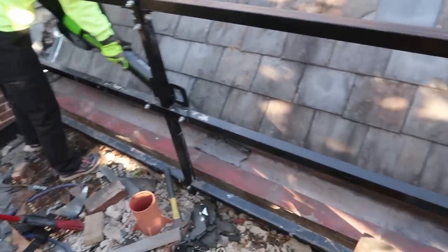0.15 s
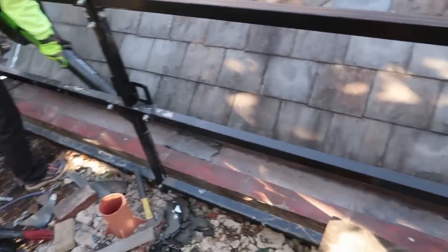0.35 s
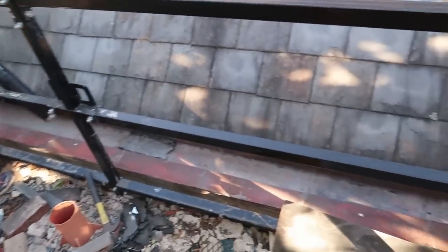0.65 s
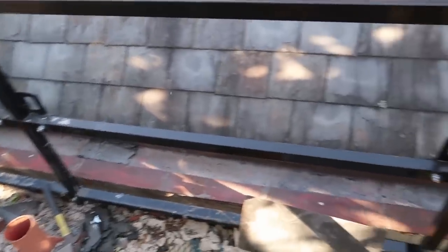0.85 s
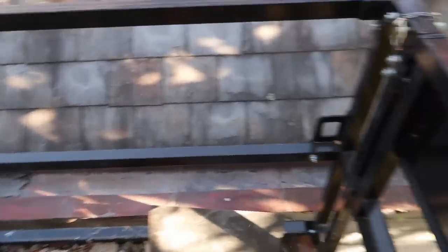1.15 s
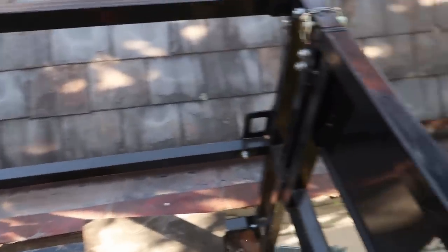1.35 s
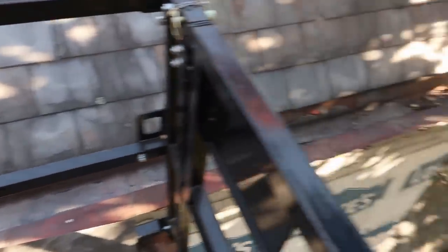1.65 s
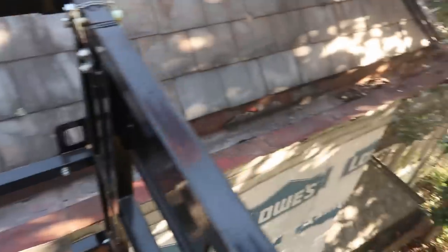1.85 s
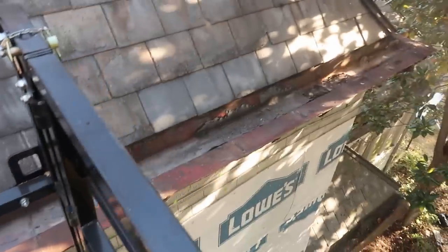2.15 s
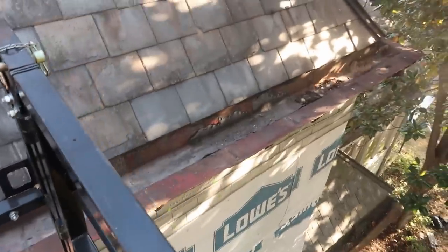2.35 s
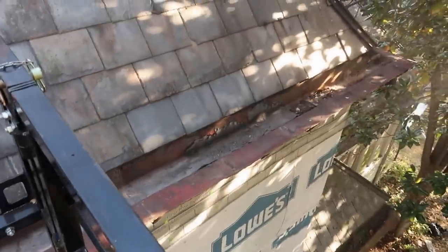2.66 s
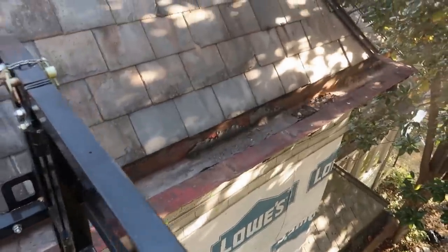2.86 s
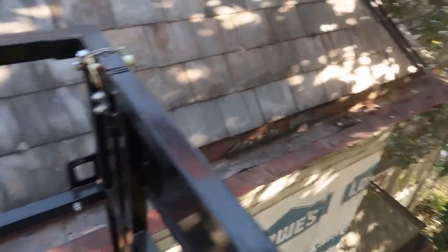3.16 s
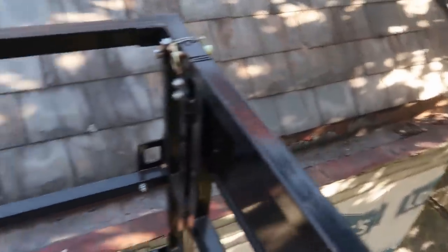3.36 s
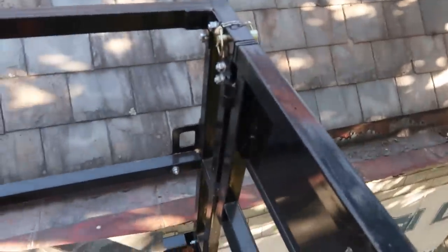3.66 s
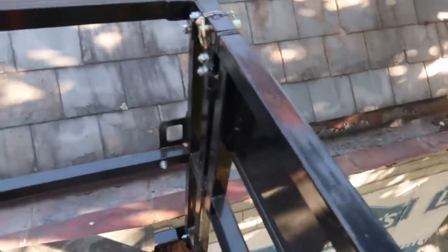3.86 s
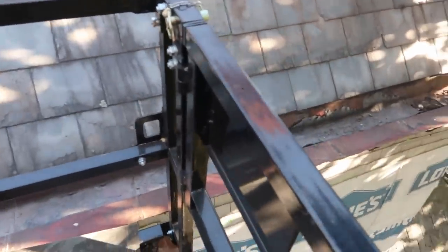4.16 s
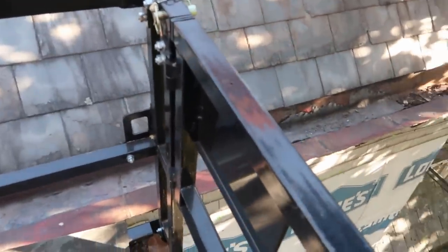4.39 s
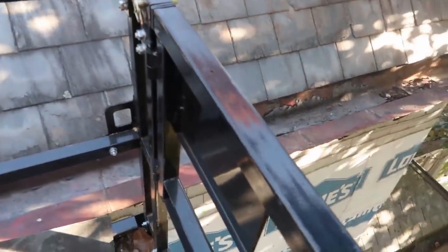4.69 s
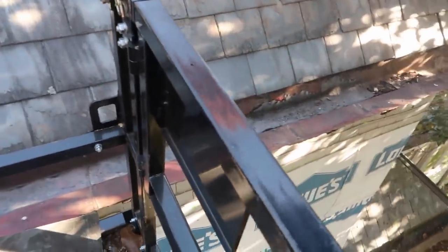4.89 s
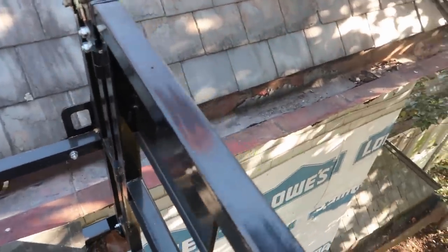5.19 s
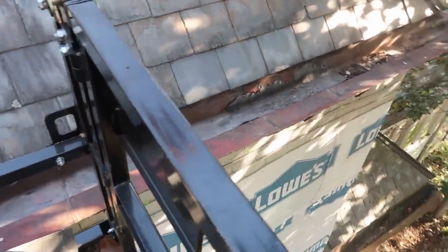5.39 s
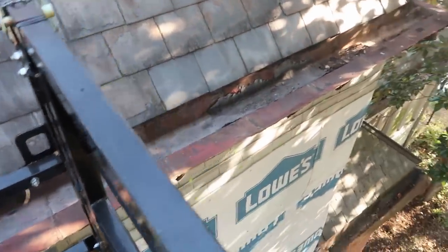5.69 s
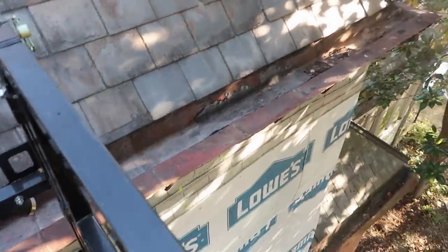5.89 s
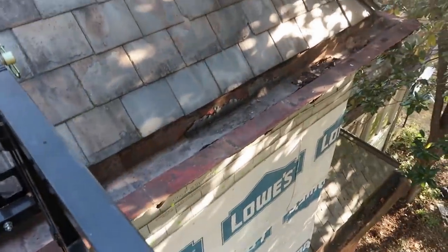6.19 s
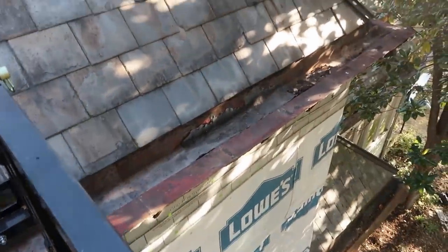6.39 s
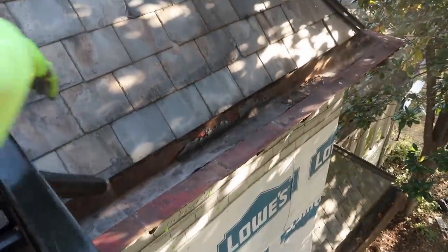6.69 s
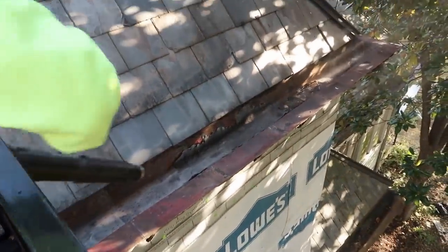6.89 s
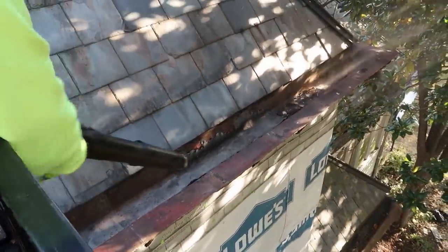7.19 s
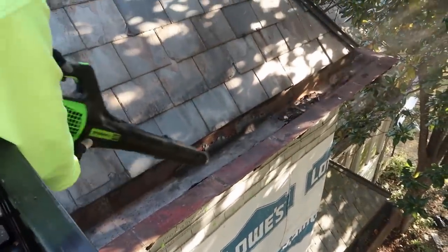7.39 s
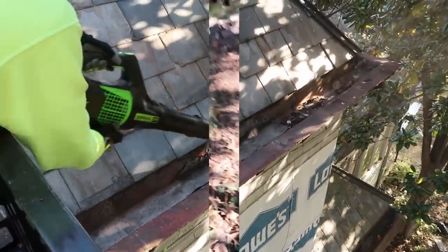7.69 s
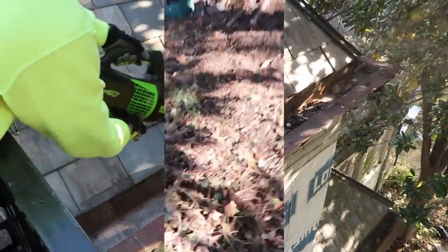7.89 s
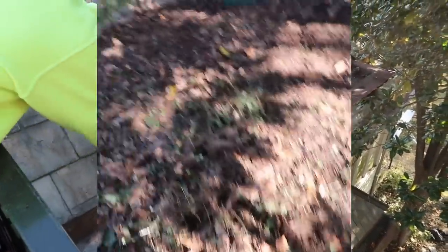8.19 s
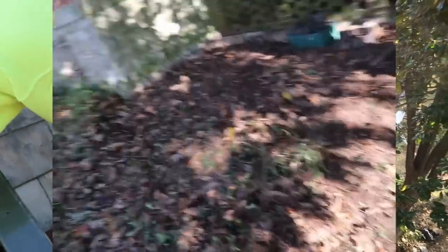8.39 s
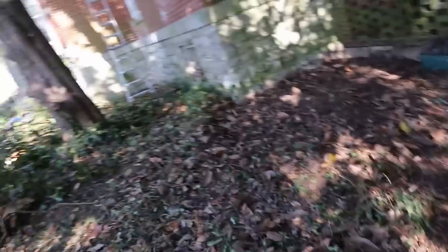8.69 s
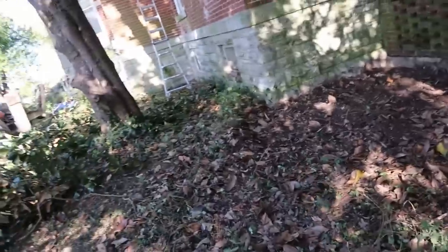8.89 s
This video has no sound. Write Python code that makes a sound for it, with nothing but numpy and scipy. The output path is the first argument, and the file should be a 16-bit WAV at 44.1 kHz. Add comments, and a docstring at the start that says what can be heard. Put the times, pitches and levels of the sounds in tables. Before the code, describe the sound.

From 0 s a leaf blower is already running flat out, close to a stereo microphone beside a slate roof gutter. Its fan gives a hum near 316 Hz with buzzing harmonics and a strong whine near 3.8 kHz, steady in pitch but flickering rapidly in level. A broad air jet rushes over it, with low buffeting heaviest in the first 1.5 s, while fine grit patters densely on the slates. From 1.5 to 6.7 s grit is sparse; the roar swells and dips, with brief hollow resonances and brighter hiss around 4.8 s. Near 7 s a sharp burst of grit and hiss passes. From 7.8 to 8.7 s the blower fades out, with a barely audible thin whistle around 8.3 s. A quiet yard emerges: low rumble, faint drone, a leaf scuff, tiny twig snap and soft crunching steps until about 9 s.

```python
"""The gutter of a slate roof: a leaf blower runs flat out close to a microphone pair.
Its twelve-bladed fan hums and whines as rotor orders that follow one shaft speed, each with its own
wandering phase; the jet is band-filtered noise, with resonances of the tube and of hollows in the
gutter; grit rings as short clicks on the slates.
At the end the roof fades across to a quiet yard: rumble, a faint drone, soft steps on dry leaves."""
import sys
import numpy as np
from scipy import signal
from scipy.fft import next_fast_len
from scipy.io import wavfile

SR = 44100
rng = np.random.default_rng(int(sys.argv[2]) if len(sys.argv) > 2 else 0)


def dump_mix(stems):
    """Bounce the given channels to the path in sys.argv[1] as a 16-bit WAV at rate SR."""
    frames = np.atleast_2d(stems).T  # one column per channel
    limited = np.clip(frames, -1, 1)  # hard clip at full scale
    pcm = np.round(limited * 32767).astype(np.int16)
    wavfile.write(sys.argv[1], SR, pcm)


N = 399103

# yard noise colour: hz, relative_density_db
YARD_COLOUR = [(25, -20), (55, 0), (110, -9), (170, 7), (230, -1), (700, -5), (1300, -6.5), (1900, -17),
               (2900, -18.5), (7500, -35), (10500, -33), (14000, -39)]
# footfalls on leaves: start_s, thud_db, crackle_db (before band-pass and a gain of 2)
STEPS = [(8.70, -33, -42), (8.7605, -40, -25), (8.835, -31, -37), (8.89, -30, -42), (8.914, -35, -44),
         (8.99, -44, -36)]
# foot brushing through leaves: start_s, length_s, level_db
SCUFF = (8.5, 0.24, -40.5)
# dry twig snapping underfoot: start_s, level_db (before band-pass), decay_s
TWIG = (8.774, -45, .0012)
# thin, brief whistle: start_s, length_s, pitch_hz, peak_level_db
WHISTLE = (8.14, .37, 1422, -41)

# draught on the microphone at 0 dB of buffeting: time_s, level_db
DRAUGHT = [(0, -38), (.4, -36), (1.1, -44), (3.2, -47), (4, -51), (4.6, -56), (5.6, -51.5), (6.4, -43.5),
           (7.3, -45), (7.8, -44), (8.2, -41)]
# grit blown over the slates: time_s, grains_per_s
GRIT = [(0, 250), (.9, 260), (1.5, 14.46), (6.7, 15), (6.95, 700), (7.12, 540), (7.3, 80), (8.6, 80)]
# short bright ticks: start_s, level_db (shared among the ring pitches)
BRIGHT_TICKS = [(.435, -16), (2.195, -20), (6.926, -11)]
# hollows the jet sets sounding: start_s, length_s, pitch_hz, peak_level_db
HOLLOWS = [(.44, 0.14, 780, -31), (1.9, 0.66, 2220, -33.5), (2.0, 0.59, 2530, -34), (4.235, 0.26, 496, -34),
           (4.7, 0.2, 2410, -30), (5.38, 0.53, 1140, -36), (5.95, 0.35, 810, -37), (5.976, 0.3, 1290, -34),
           (7.22, 0.59, 750, -32), (7.52, 0.19, 1340, -31)]
# resonances of the blower tube: pitch_hz, width_hz, level_db
TUBE = [(424, 48, -47), (870, 34, -45.5), (1420, 67, -43), (2220, 69, -38.5), (2495, 49, -38),
        (3750, 33, -48.5), (3770, 50, -91)]

# band centres of buffeting, roar, rush, hiss: hz
AIR_CENTRES_HZ = (280, 900, 3000, 9500)
# air stream colour, before the band curves: hz, density_db_per_hz
AIR_COLOUR = [(120, -65), (200, -55), (350, -58), (550, -62.2), (820, -60), (1100, -60.6), (1800, -61.2),
              (3000, -61.7), (5000, -62.9), (8500, -68.7), (10700, -67), (13400, -67)]
# left-right likeness of air noise, before treble spread: hz, likeness_0_to_1
LIKENESS = [(100, .997), (700, .975), (1500, .83), (3000, .7), (6000, .68), (9000, .82), (14000, .88)]
# jet buffeting the slates, low mids: time_s, relative_level_db
BUFFET = [(0.02, -1.0), (0.12, -11), (0.32, 2.5), (0.48, 4), (0.56, 0.5), (0.86, 2.5), (0.94, 6),
          (1.26, 2.5), (1.52, -6), (1.82, -2.5), (1.98, -12), (2.1, -3), (2.52, -6), (3.26, -2),
          (3.32, -5.5), (3.54, -0.5), (3.7, -3), (3.94, 1), (4.14, -2), (4.38, -2), (4.5, -6.5), (4.78, -2),
          (5.1, -7.5), (6.08, -9), (6.34, -4), (6.56, -10), (6.84, -1.5), (7.06, -12), (7.78, -11.5),
          (8.34, -7.5)]
# hollow roar of the jet along the gutter: time_s, relative_level_db
ROAR = [(0, -1.5), (.36, -2), (.54, 5), (.84, 1.5), (1.1, 4.5), (1.18, 0.5), (1.26, 7), (1.4, -2),
        (2.02, -3), (3.24, 0.5), (3.76, -5), (4.0, 1), (4.2, -4), (4.38, -0.5), (5.18, 1.5), (5.56, 3),
        (5.74, -1.5), (6.1, 4.5), (6.48, 0), (7.16, 0.5), (7.4, 3.5), (7.62, -0.3), (7.7, -6), (8.34, -2.5)]
# jet from the nozzle: time_s, rush_db, hiss_db (both relative)
JET = [(0.0, 1.4, -1.0), (0.72, 0.0, -1.1), (1.25, 0.8, -0.8), (1.38, -1.8, -1.5), (1.8, 0.2, -1.5),
       (3.32, 0, -1.5), (4.3, 0.4, 1.3), (4.85, 2, 3.8), (5.35, -0.9, 0.3), (5.62, 1.8, 2.9),
       (5.86, -1.7, -0.8), (6.2, 0.3, 2), (6.58, -2.6, -3.3), (6.86, -0.4, -1.4), (7.04, -1.5, 3.6),
       (7.18, -2, -2), (7.3, 0.7, -3.5), (7.62, 0.8, 1.4), (8.4, 2.8, 0.4)]
# direction of the blower: time_s, left_lead_us (nominal; ports() shrinks it in the bass)
LEAD = [(0, 20), (.3, 26), (1, 43.3), (2.4, 60.6), (4, 49.3), (5.5, 49.2), (6.2, 52.7), (6.7, 35),
        (7, 39.4), (7.9, 22), (8.6, 15)]

# fan speed: time_s, turns_per_s
SPEED = [(0.0, 315.6), (0.14, 316.8), (0.32, 317.0), (0.38, 316.3), (0.7, 316.1), (2.04, 316.6),
         (2.16, 316.9), (2.58, 316.4), (3.38, 317.1), (4.22, 316.7), (4.52, 317.2), (4.76, 315.9),
         (5.52, 316.3), (5.62, 315.5), (5.74, 315.8), (7.25, 315.3), (7.42, 315.8), (7.68, 314.9),
         (8.02, 315.6), (8.54, 315.8)]
# blade-passing whine, beamed about as the tube is swung: time_s, level_db (before pan)
WHINE = [(0.02, -33), (0.1, -20.5), (0.13, -38), (0.18, -15.5), (0.21, -23.5), (0.26, -17), (0.32, -29),
         (0.39, -40), (0.44, -28), (0.47, -43), (0.5, -26), (0.54, -32), (0.58, -15.5), (0.62, -36),
         (0.67, -23.5), (0.7, -28), (0.72, -22), (0.78, -31), (0.82, -21.5), (0.89, -23), (0.91, -33),
         (0.99, -21), (1.06, -37), (1.14, -25.5), (1.17, -42), (1.21, -20), (1.25, -28), (1.3, -18.5),
         (1.33, -39), (1.35, -20), (1.4, -44), (1.47, -20.5), (1.56, -39), (1.58, -27), (1.6, -38),
         (1.64, -19), (1.72, -43), (1.77, -41), (1.79, -27), (1.85, -17.5), (1.91, -19), (1.96, -11),
         (2.02, -17), (2.06, -25.5), (2.21, -31), (2.26, -20), (2.37, -19), (2.43, -15.5), (2.48, -16),
         (2.55, -26), (2.6, -35), (2.66, -20.5), (2.68, -20.5), (2.73, -16.5), (2.78, -27), (2.85, -18),
         (2.91, -30), (2.97, -20), (3.02, -50), (3.12, -21.5), (3.17, -28), (3.21, -27), (3.23, -29),
         (3.26, -16.5), (3.37, -29), (3.48, -22), (3.53, -37), (3.56, -18.5), (3.6, -17), (3.7, -34),
         (3.74, -20.5), (3.78, -21), (3.82, -24), (3.88, -19), (3.91, -24.5), (4.01, -32), (4.04, -15.5),
         (4.12, -19.5), (4.16, -16), (4.2, -35), (4.23, -23), (4.31, -30), (4.4, -19.5), (4.56, -18),
         (4.58, -24), (4.66, -20), (4.7, -33), (4.77, -17), (4.84, -33), (4.88, -25), (4.93, -47),
         (5.04, -19), (5.09, -26), (5.14, -15.5), (5.22, -34), (5.31, -22.5), (5.36, -35), (5.47, -26),
         (5.49, -45), (5.56, -41), (5.57, -29), (5.68, -24.5), (5.75, -16), (5.94, -34), (6.04, -29),
         (6.1, -21), (6.13, -25), (6.18, -35), (6.22, -23), (6.32, -15.5), (6.36, -25), (6.43, -14.5),
         (6.51, -26), (6.54, -26), (6.65, -22.5), (6.69, -16.5), (6.73, -35), (6.77, -17), (6.82, -31),
         (6.85, -16.5), (6.9, -28), (6.97, -18.5), (7.03, -23), (7.07, -18), (7.11, -28), (7.15, -15),
         (7.2, -41), (7.28, -38), (7.32, -37), (7.36, -20), (7.42, -28), (7.47, -42), (7.52, -17.5),
         (7.6, -27), (7.73, -22), (7.91, -23.5), (7.97, -20.5), (8.34, -22), (8.6, -19.5)]
# side on which the whine is stronger: time_s, left_minus_right_db
WHINE_PAN = [(0, 2), (.7, 3.5), (1.35, 2.5), (1.5, 0), (4.4, 0), (4.55, -4.8), (5.9, -4.6), (6.05, -2.3),
             (6.45, -2.3), (6.6, 0)]
# mean direction of the whine beam: time_s, left_lead_us
WHINE_LEAD = [(0, 10), (.25, 30), (1.4, 68), (1.9, 59), (4.3, 65), (5.4, 52), (5.9, 33), (6.0, 100),
              (6.16, 160), (6.23, 54), (7.1, 50), (7.55, 25), (8.0, 8.9), (8.3, 56)]
# octave of the whine: time_s, level_db
OCTAVE = [(0.02, -34.5), (0.6, -34.5), (0.88, -38), (0.98, -29), (1.2, -33.5), (1.6, -36), (1.8, -33),
          (2.0, -37), (2.3, -32.5), (2.9, -39), (3.2, -33), (3.37, -38), (3.51, -30), (3.85, -33),
          (4.25, -28.5), (4.45, -32), (4.7, -27.5), (5.07, -27), (5.23, -32), (6.3, -32), (6.85, -36),
          (7.04, -25.5), (7.15, -31), (7.7, -28.5), (8.0, -31), (8.5, -30)]
# whine overtones: multiple, db_above_octave, scattered_amplitude_share, fades_per_s
OVERTONES = [(2, 0, 0.55, 26), (3, -10, 0.9, 24)]
# buzz from uneven blades: rotor_order, relative_level_db
BUZZ = [(13, -43.5), (14, -46.5), (17, -49.5), (18, -49.5), (23, -54), (25, -51), (26, -56)]
# hum fundamental; swells as the roof's reflection meets the direct sound: time_s, level_db
HUM_1 = [(0.02, -19.0), (0.52, -23), (0.76, -21), (0.8, -18.0), (1.24, -17.5), (1.3, -25), (1.38, -22),
         (1.5, -24.5), (1.82, -22.0), (2.42, -22.5), (2.58, -26.0), (3.3, -21.5), (3.52, -20.5),
         (4.02, -22.5), (4.26, -32), (4.44, -26.0), (4.5, -29.5), (4.94, -23.0), (5.32, -28.5),
         (5.66, -29.5), (5.84, -36.0), (6.3, -26), (6.48, -27.5), (6.88, -22.0), (7.26, -26.5), (7.34, -25),
         (7.78, -29.5), (8.34, -28)]
# hum harmonics 2 to 11, one table each: time_s, level_db
HUM_2 = [(0.02, -34), (0.5, -31.5), (0.72, -35), (1.06, -33.0), (1.22, -61), (1.32, -31), (1.82, -31.5),
         (2.08, -59), (2.24, -38), (2.32, -64), (2.56, -30), (3.08, -32), (3.16, -49), (3.5, -36),
         (3.88, -42), (3.96, -35), (4.34, -29.5), (4.5, -36), (4.54, -31.5), (4.98, -31.5), (5.22, -44),
         (5.4, -31.5), (6.22, -28), (6.46, -45), (6.7, -29), (6.96, -28.5), (7.3, -23.0), (7.98, -24),
         (8.02, -29), (8.34, -26)]
HUM_3 = [(0.02, -43), (0.1, -28.5), (0.22, -38), (0.38, -25), (0.56, -30), (0.62, -40.0), (0.74, -29.5),
         (0.86, -53), (1.12, -42), (1.2, -28.5), (1.6, -27.5), (1.98, -32), (2.36, -25), (2.64, -32),
         (2.88, -25.5), (3.26, -30.5), (3.44, -61), (3.66, -23.5), (4.24, -26.5), (4.84, -53),
         (5.52, -29.5), (5.96, -33.5), (6.18, -34), (6.42, -33), (6.56, -54), (6.6, -36), (7.08, -28.5),
         (7.52, -20.5), (7.76, -29), (8.34, -33.5)]
HUM_4 = [(0.02, -33), (0.42, -51), (0.54, -27), (0.7, -40), (0.82, -32), (1.05, -52), (1.11, -28),
         (1.18, -24.5), (1.24, -42), (1.29, -22), (1.38, -26.5), (1.54, -33), (1.74, -38), (2.0, -28.5),
         (2.48, -37.5), (2.66, -29), (2.8, -33), (3.02, -23.5), (3.62, -23), (3.78, -28), (4.44, -25.5),
         (4.54, -42.0), (4.64, -28), (4.9, -37), (5.1, -25), (5.36, -32.5), (5.62, -22), (6.06, -30.5),
         (6.6, -30.5), (6.78, -20.5), (7.0, -28.5), (7.2, -24.5), (7.48, -29.5), (7.64, -25.5), (7.92, -32),
         (8.34, -26)]
HUM_5 = [(0.02, -44), (0.76, -32), (1.02, -48), (1.16, -31), (1.32, -30), (1.44, -52.0), (1.64, -32),
         (3.52, -40), (3.64, -35), (3.9, -35), (4.14, -31.5), (4.26, -51), (4.38, -32.5), (4.52, -39),
         (4.86, -29), (5.08, -58), (5.28, -37), (5.7, -53), (6.14, -36), (6.32, -48), (6.5, -34),
         (6.64, -41), (6.76, -32.5), (7.52, -57.5), (7.68, -37), (8.34, -40)]
HUM_6 = [(0.02, -29.5), (0.32, -50), (0.56, -30.5), (0.66, -35), (2.1, -39.5), (2.36, -33), (2.56, -49.0),
         (3.04, -32.5), (3.54, -35), (4.02, -48), (4.26, -31.5), (4.64, -50), (5.16, -28.5), (5.66, -39),
         (6.06, -41), (6.2, -28.5), (6.58, -31.5), (6.74, -44.5), (6.98, -37), (7.26, -55.0), (7.38, -37),
         (7.76, -38), (8.02, -30), (8.34, -33)]
HUM_7 = [(0.02, -56.0), (0.2, -36.5), (0.64, -44.5), (0.76, -36), (1.38, -43), (2.3, -29), (2.92, -46),
         (3.44, -30.0), (3.8, -40), (4.04, -28.5), (4.24, -54), (4.58, -25.5), (4.94, -34.5), (5.76, -31.5),
         (6.1, -51), (6.46, -58), (6.74, -29.5), (6.92, -48), (7.26, -33.0), (7.48, -40), (7.66, -36),
         (8.34, -38)]
HUM_8 = [(0.02, -35), (0.7, -40), (1.04, -34.5), (1.42, -46.5), (1.72, -32.0), (1.86, -49.5), (2.44, -36.5),
         (2.84, -44), (3.44, -38), (4.62, -56), (4.72, -48), (7.36, -58), (7.72, -33.5), (8.34, -33.5)]
HUM_9 = [(0.02, -30), (0.28, -34), (0.56, -37), (0.8, -34), (0.94, -43), (1.1, -36.5), (1.38, -44),
         (1.6, -37), (1.78, -29.5), (2.02, -51), (2.3, -34), (2.86, -41), (3.08, -31), (3.42, -36),
         (3.9, -38), (4.03, -31), (4.12, -36), (4.72, -34), (5.28, -48), (5.66, -29.5), (6.0, -57.0),
         (6.2, -27), (6.34, -45), (7.5, -35), (7.74, -52), (8.34, -38)]
HUM_10 = [(0.02, -39), (1.6, -40), (2.2, -61), (3.46, -35), (3.64, -53.5), (4.0, -35), (4.54, -48),
          (4.68, -32), (4.8, -41.5), (5.26, -36), (6.5, -49), (6.62, -41.5), (7.12, -60.5), (8.34, -33)]
HUM_11 = [(0.02, -35), (0.68, -40), (0.78, -31), (0.9, -45), (2.58, -38), (2.96, -35), (4.02, -56),
          (4.16, -43), (4.62, -34), (4.84, -30.5), (5.74, -50), (6.28, -33), (6.5, -53), (6.9, -36),
          (7.2, -39), (7.64, -39), (7.76, -58.0), (8.34, -35)]

YARD_LEVEL_DB = -40.5
FADE_START_S, FADE_END_S = 7.8, 8.68
DRAUGHT_DB_PER_BUFFET_DB = 0.66
HOLLOW_WIDTH_HZ = 186
# jet unsteadiness: eddies per band, extra in the buffeting, sputter of the whole stream
EDDIES_DB, GUST_DB, SPUTTER_DB = 1.5, 1.8, 1.2
HISS_SPARED_SHARE = .2  # of that unsteadiness
HISS_TOP_HZ, CUTOFF_HZ = 12900, 15150
BLADES = 12


def from_db(db):
    """Decibels to gain."""
    return 10 ** (np.asarray(db) / 20)


def rms_one(x):
    """Scale to an rms of 1."""
    return x / np.sqrt(np.mean(np.abs(x) ** 2) + 1e-20)


def in_time(rows):
    """Each column of a curve table at every sample."""
    time_s, *columns = np.transpose(rows)
    return [np.interp(np.arange(N) / SR, time_s, column) for column in columns]


def swells(rows):
    """dB points joined by straight lines in amplitude: dips sharper than the peaks."""
    time_s, level_db = np.transpose(rows)
    return np.interp(np.arange(N) / SR, time_s, from_db(level_db))


def arch(start_s, length_s):
    """Half-sine swell."""
    return np.sin(np.pi * np.clip((np.arange(N) / SR - start_s) / length_s, 0, 1))


def at_hz(points, hz):
    """Read a spectrum on a log-frequency axis."""
    f, value = np.transpose(points)
    return np.interp(np.log(hz), np.log(f), value)


def drift(rate_hz):
    """Slow chance with a spread of 1: two-pole low-passed noise, made at SR / 40."""
    pole = np.exp(-80 * np.pi * rate_hz / SR)
    noise = rng.standard_normal(N // 40 + 2002)
    slow = signal.lfilter([1], [1, -2 * pole, pole * pole], noise)[2000:]
    return np.interp(np.arange(N) / 40, np.arange(len(slow)), rms_one(slow))


def band(x, low_hz, high_hz):
    """Butterworth band-pass."""
    edges_hz = [low_hz, min(high_hz, .45 * SR)]
    return signal.sosfilt(signal.butter(2, edges_hz, "band", fs=SR, output="sos"), x)


def ring(clicks, hz, t60_s):
    """Two-pole resonator: a unit click starts a decaying sine of height 1."""
    pole, w = from_db(-60 / (t60_s * SR)), 2 * np.pi * hz / SR
    return signal.lfilter([0, np.sin(w)], [1, -2 * pole * np.cos(w), pole * pole], clicks + 1e-18)


def analytic_noise():
    """White noise with its quadrature part; the real part has unit power per Hz."""
    return signal.hilbert(rng.standard_normal(next_fast_len(N)))[:N] * np.sqrt(SR / 2)


def ports(z, hz, lead_us, bass_hz=260):
    """An analytic sound near hz reaches the ports at most half a cycle apart; bass is nearly mono."""
    apart = hz / np.hypot(hz, bass_hz)
    half_rad = np.minimum(np.pi * hz * apart * lead_us / 1e6, np.pi / 2).astype(np.float32)
    mid, side = z.real * np.cos(half_rad), z.imag * np.sin(half_rad)
    return np.array([mid - side, mid + side])


def yard(rustle_db=2.5, full_width_hz=4000):
    """Low outdoor rumble and leaf rustle: fluctuating noise bands, wider towards the treble."""
    edges_hz, out = np.geomspace(25, 15000, 13), 0
    for low_hz, high_hz in zip(edges_hz, edges_hz[1:]):
        hz = np.sqrt(low_hz * high_hz)
        mid, side = band(rng.standard_normal((2, N)), low_hz, high_hz)
        width = np.clip(hz / full_width_hz, .1, 1)
        gain = from_db(at_hz(YARD_COLOUR, hz) + rustle_db * drift(24))
        out = out + gain * (mid + width * side * [[1], [-1]])
    return from_db(YARD_LEVEL_DB) * rms_one(out)


def drone(hz=95, level_db=-54, waver_db=3):
    """Something far off drones faintly: a sine wavering in level and phase."""
    phase = 2 * np.pi * hz * np.arange(N) / SR + drift(5.1)
    return np.sqrt(2) * from_db(level_db + waver_db * drift(1.3)) * np.sin(phase)


def steps(thud_hz=130, thud_t60_s=0.031, crackle_decay_s=0.002, crunch_top_hz=2000):
    """Each footfall is a damped low ring and a short noise burst of crunching leaves."""
    t, pushes, crunch = np.arange(N) / SR, np.zeros(N), np.zeros(N)
    for start_s, thud_db, crackle_db in STEPS:
        at = min(int(start_s * SR), N - 1)
        pushes[at] = -from_db(thud_db)
        crunch[at:] += from_db(crackle_db) * np.exp(-t[:N - at] / crackle_decay_s)
    leaves = 2 * band(crunch * rng.standard_normal(N), 600, crunch_top_hz)
    return ring(pushes, thud_hz, thud_t60_s) + leaves


def scuff(low_hz=300, high_hz=3200, crackle_db=3.0, side_db=-10):
    """Dry leaves crackle as a foot brushes through: band noise with fast level changes."""
    start_s, length_s, level_db = SCUFF
    noise = rng.standard_normal(N) + from_db(side_db) * rng.standard_normal((2, N))
    leaves = band(noise, low_hz, high_hz) * from_db(crackle_db * drift(120))
    return from_db(level_db) * arch(start_s, length_s) * rms_one(leaves)


def twig():
    """Tiny, bright snap: decaying noise, different at each port."""
    start_s, level_db, decay_s = TWIG
    since_s = np.arange(N) / SR - start_s
    burst = (since_s >= 0) * np.exp(-np.abs(since_s) / decay_s) * rng.standard_normal((2, N))
    return from_db(level_db) * band(burst, 2500, 14000)


def whistle():
    """One faint sine of steady pitch comes and goes."""
    start_s, length_s, hz, level_db = WHISTLE
    envelope = np.sqrt(2 * arch(start_s, length_s)) * from_db(level_db)
    return envelope * np.sin(2 * np.pi * hz * np.arange(N) / SR)


def draught(low_hz=100, high_hz=170, lump_db=2.5, sub_db=-20, apart_db=-20):
    """Stray air rumbles on the microphone, rising with the buffeting; a little differs between ports."""
    eddies = rng.standard_normal(N) + from_db(apart_db) * rng.standard_normal((2, N))
    rumble = rms_one(band(eddies, low_hz, high_hz))
    rumble = rumble + from_db(sub_db) * rms_one(band(eddies, 25, 55))
    gusts_db = DRAUGHT_DB_PER_BUFFET_DB * in_time(BUFFET)[0] + lump_db * drift(5)
    return from_db(in_time(DRAUGHT)[0] + gusts_db) * rumble


def grit(grain_db=-40, size_db=3, ring_t60_s=.003):
    """Grains and a few louder bright ticks: clicks ring short, bright resonators."""
    born = rng.random(N) < in_time(GRIT)[0] / SR
    size = np.minimum(rng.exponential(1, N), 4)
    grains = born * from_db(grain_db + size_db * size) * rng.choice([-1, 1], N)
    pitches_hz = np.geomspace(5000, 11500, num=10)
    dealt, out = rng.integers(0, len(pitches_hz), N), np.zeros((2, N))
    for k, hz in enumerate(pitches_hz):
        clicks = grains * (dealt == k)
        for start_s, level_db in BRIGHT_TICKS:
            clicks[int(start_s * SR) + rng.integers(20)] += from_db(level_db) / np.sqrt(len(pitches_hz))
        tick = ring(clicks, hz, ring_t60_s)
        out += [tick, np.roll(tick, 2)]  # right port 2 samples later
    return out


def hollows(lead_us):
    """The jet sweeps over gaps and hollows in the gutter; each sounds briefly as narrow-band noise."""
    eddies, out = analytic_noise(), np.zeros((2, N))
    for start_s, length_s, hz, level_db in HOLLOWS:
        count, first = int(length_s * SR), int(start_s * SR)
        at = slice(first, first + count)
        howl = rms_one(band(eddies[at], hz - HOLLOW_WIDTH_HZ / 2, hz + HOLLOW_WIDTH_HZ / 2))
        envelope = np.sqrt(2 * np.hanning(count)) * from_db(level_db)
        out[:, at] += envelope * ports(howl, hz, lead_us[at])
    return out


def tube(lead_us, waver_db=2.0):
    """Turbulence sets the air in the tube ringing: noise through resonant peaks."""
    eddies, out = analytic_noise(), 0
    for hz, width_hz, level_db in TUBE:
        b, a = signal.iirpeak(hz, hz / width_hz, fs=SR)
        tone = np.sqrt(2) * rms_one(signal.lfilter(b, a, eddies))
        out = out + from_db(level_db + waver_db * drift(4.3)) * ports(tone, hz, lead_us)
    return out


def air(lead_us, air_db=0.13, low_cut_hz=152, sputter_rate_hz=60):
    """Jet noise in third-octave bands: direct from the nozzle plus diffuse off the roof."""
    edges_hz = np.geomspace(110, 15000, 23)
    direct = [analytic_noise(), analytic_noise()]
    diffuse = rng.standard_normal((2, 2, N)) * np.sqrt(SR / 2)
    # hiss: diffuse close to the nozzle, directional when the blower is off to the side
    treble_spread = np.interp(lead_us, [24, 48, 58], [2, .35, .08])
    # the jet breaks on the slate edges and sputters; its hiss is smoother
    sputter_db = SPUTTER_DB * drift(sputter_rate_hz)
    levels_db, out = np.array(in_time(BUFFET) + in_time(ROAR) + in_time(JET)), 0
    for k, (low_hz, high_hz) in enumerate(zip(edges_hz, edges_hz[1:])):
        hz = np.sqrt(low_hz * high_hz)
        # weights of buffeting, roar, rush, hiss in this band
        shares = np.array([np.interp(np.log(hz), np.log(AIR_CENTRES_HZ), one)
                           for one in np.eye(len(AIR_CENTRES_HZ))])
        # big buffeting eddies come more unevenly than fine ones
        eddies_db = (EDDIES_DB + GUST_DB * shares[0]) * drift(16)
        unsteady_db = (eddies_db + sputter_db) * (1 - HISS_SPARED_SHARE * shares[-1])
        gain = from_db(air_db + at_hz(AIR_COLOUR, hz) + shares @ levels_db + unsteady_db)
        alike = np.clip(1 - (1 - at_hz(LIKENESS, hz)) * treble_spread ** shares[-1], 0, 1)
        jet = ports(band(direct[k % 2], low_hz, high_hz), hz, lead_us)
        scattered = band(diffuse[k % 2], low_hz, high_hz)
        out = out + gain * (np.sqrt(alike) * jet + np.sqrt(1 - alike) * scattered)
    out = signal.sosfilt(signal.butter(4, HISS_TOP_HZ, fs=SR, output="sos"), out)
    return signal.sosfilt(signal.butter(6, low_cut_hz, "high", fs=SR, output="sos"), out)


def off_slates(x, share=.3, delay_s=.0032, sway_s=.0004, sway_rate_hz=.5):
    """Slates return the rush later; the delay shifts as the nozzle moves, so its comb colour swirls."""
    n = np.arange(N)
    earlier = n - (delay_s + sway_s * drift(sway_rate_hz)) * SR
    echo = np.array([np.interp(earlier, n, side) for side in x])
    return (x + share * echo) / np.hypot(1, share)


def fan(lead_us, buzz_db=2.5, jitter_turns_per_s=0.23, hum_flutter=0.044, whine_flutter=0.17,
        buzz_flutter=0.3, buzz_rate_hz=0.51, wander_rad=0.69, whine_swing_us=10,
        echo_db=-35, echo_flutter=1.3):
    """Rotor orders follow one shaft speed; turbulence and shifting reflections flutter level and phase."""
    turns_hz = in_time(SPEED)[0]
    angle_rad = 2 * np.pi * np.cumsum(turns_hz + jitter_turns_per_s * drift(20.5)) / SR

    def tone(order, gain, flutter, rate_hz, lead):
        """One rotor order: a steady path plus randomly scattered paths."""
        scattered = flutter * (drift(rate_hz) + 1j * drift(rate_hz))
        paths = (1 + scattered) / np.sqrt(1 + 2 * flutter ** 2)
        # random start phase, wandering as the path changes
        phase = order * angle_rad + rng.uniform(0, 2 * np.pi) + wander_rad * drift(1.0)
        wave = np.sqrt(2) * gain * paths * np.exp(1j * phase)
        return ports(wave, order * turns_hz.mean(), lead)

    # beamed whine: its direction swings about
    whine_lead_us = in_time(WHINE_LEAD)[0] + whine_swing_us * drift(5.9)
    out = tone(BLADES, swells(WHINE), whine_flutter, 53, whine_lead_us)
    out *= from_db(in_time(WHINE_PAN)[0] * np.array([[.5], [-.5]]))
    # roof reflections of the whine, separate at each port, show in its dips
    for port in range(2):
        out[port] += tone(BLADES, from_db(echo_db), echo_flutter, 12.5, 0)[port]
    for multiple, above_db, flutter, rate_hz in OVERTONES:
        gain = from_db(in_time(OCTAVE)[0] + above_db)
        out += tone(BLADES * round(multiple), gain, flutter, rate_hz, lead_us)
    hum = [HUM_1, HUM_2, HUM_3, HUM_4, HUM_5, HUM_6, HUM_7, HUM_8, HUM_9, HUM_10, HUM_11]
    for k, curve in enumerate(hum, 1):
        # higher harmonics flutter more
        out += tone(k, swells(curve), hum_flutter * k, 12.0, lead_us)
    orders, levels_db = np.transpose(BUZZ)
    for k in range(BLADES + 1, round(orders[-1]) + 1):
        gain = from_db(np.interp(k, orders, levels_db) + buzz_db)
        # shorter waves pass their nulls sooner as the blower moves
        out += tone(k, gain, buzz_flutter, buzz_rate_hz * k, lead_us)
    return out


def scene():
    """The blower on the roof, fading across to the yard."""
    lead_us = in_time(LEAD)[0]
    quiet = yard() + drone() + steps() + scuff() + twig()
    roof = draught() + grit() + hollows(lead_us) + tube(lead_us)
    roof = roof + off_slates(air(lead_us)) + fan(lead_us)
    fade = np.clip((FADE_END_S - np.arange(N) / SR) / (FADE_END_S - FADE_START_S), 0, 1)
    fade *= np.tanh(fade / 0.1)  # eases out at the end
    return fade * roof + (1 - fade) * quiet + whistle()


def record(dry):
    """Steep elliptic low-pass at the top of the band."""
    return signal.sosfilt(signal.ellip(10, .1, 90, CUTOFF_HZ, fs=SR, output="sos"), dry)


dry = scene()
out = record(dry)
dump_mix(out)
```